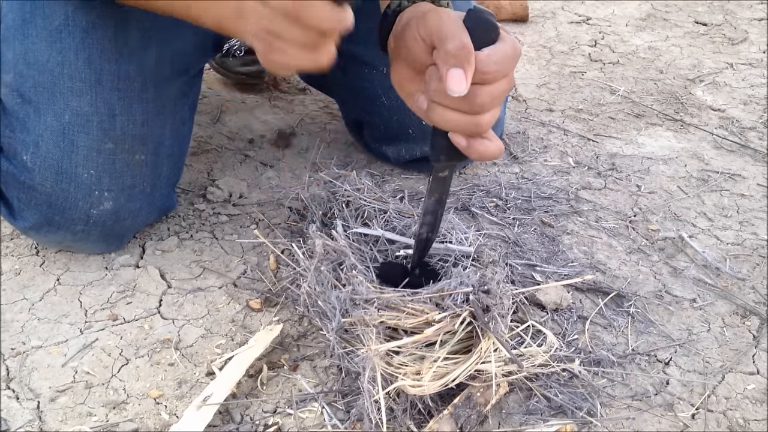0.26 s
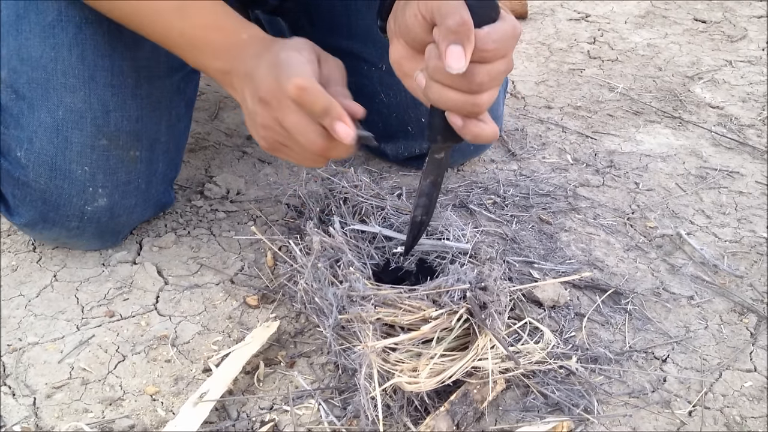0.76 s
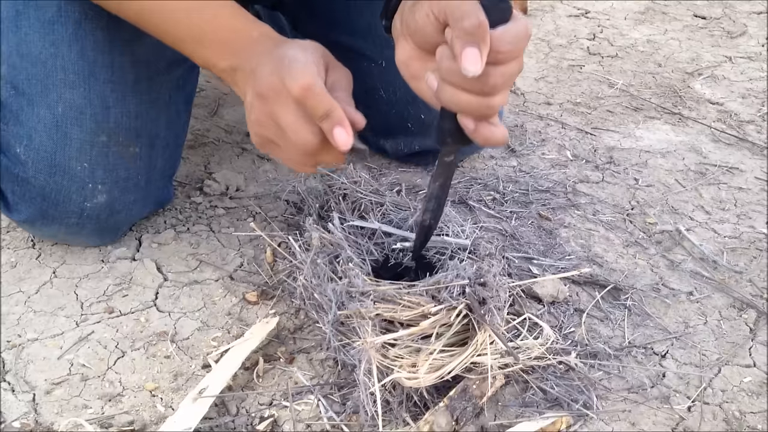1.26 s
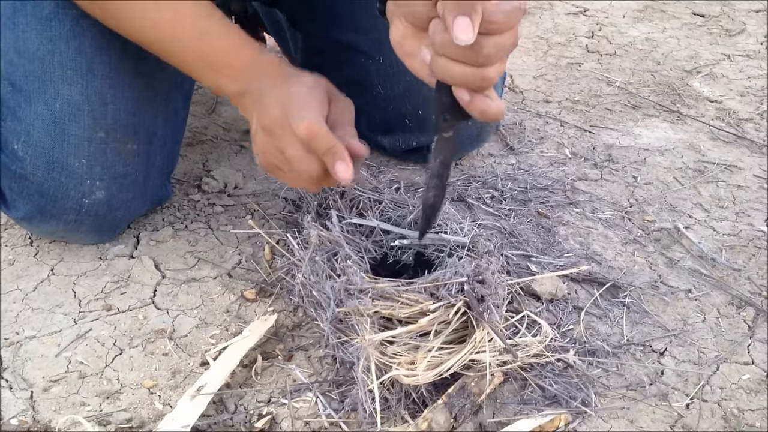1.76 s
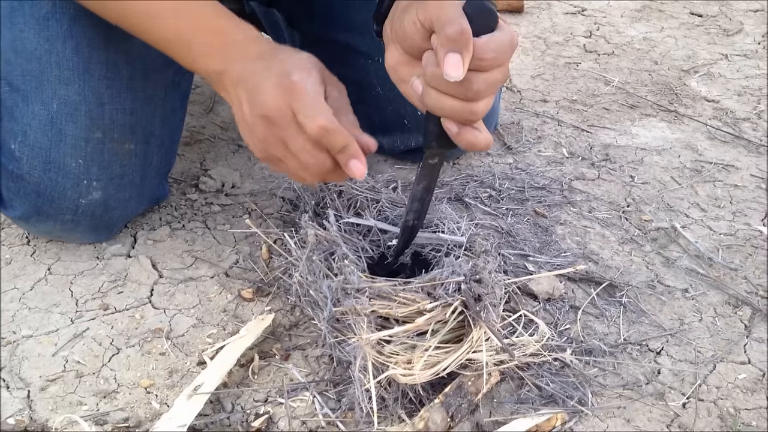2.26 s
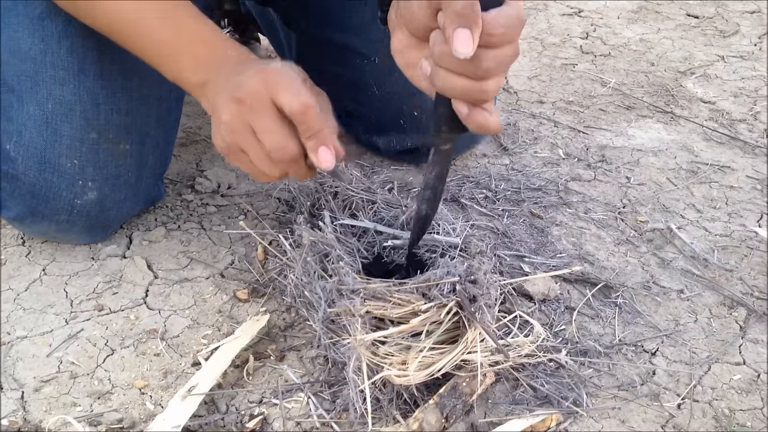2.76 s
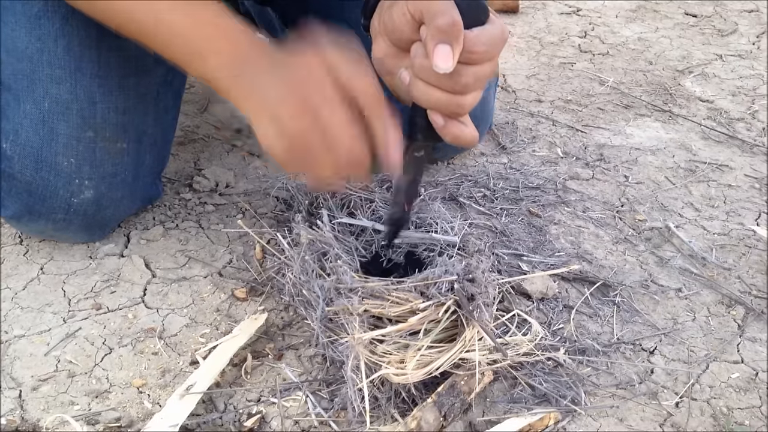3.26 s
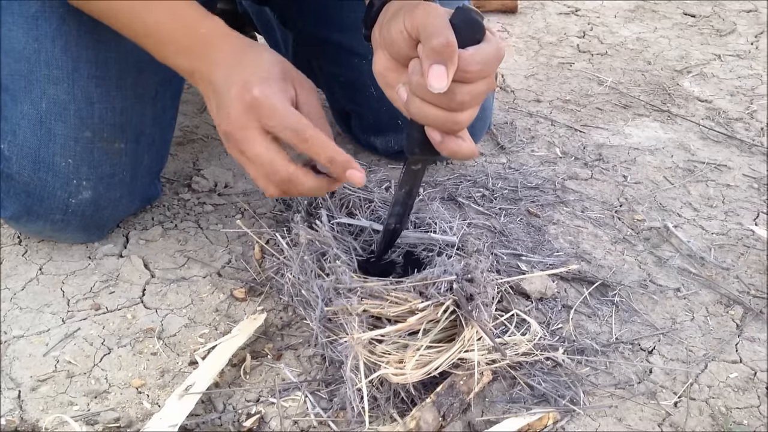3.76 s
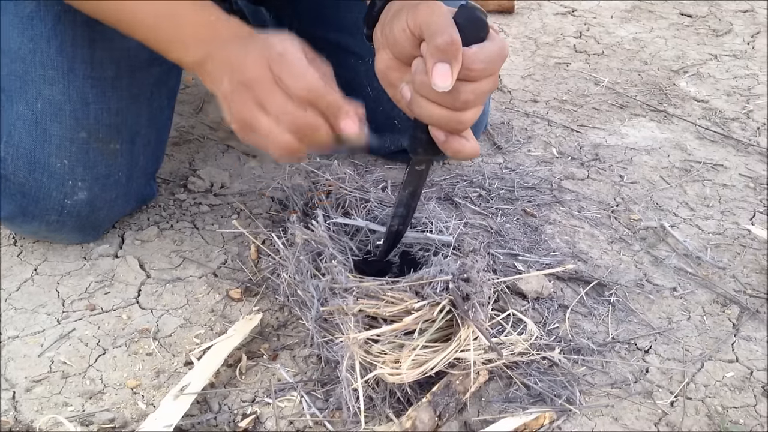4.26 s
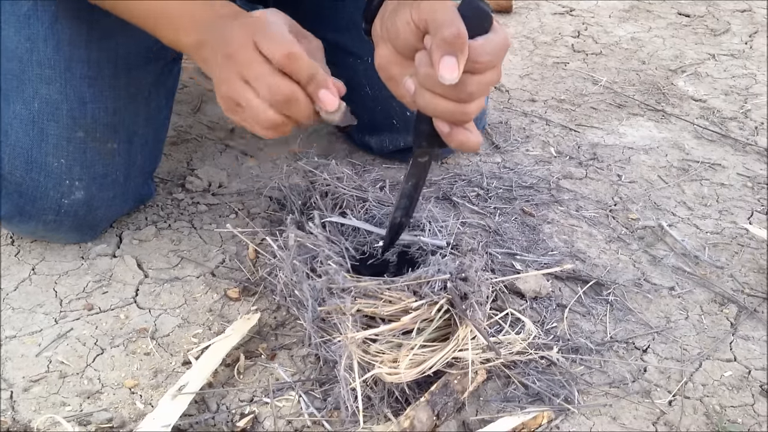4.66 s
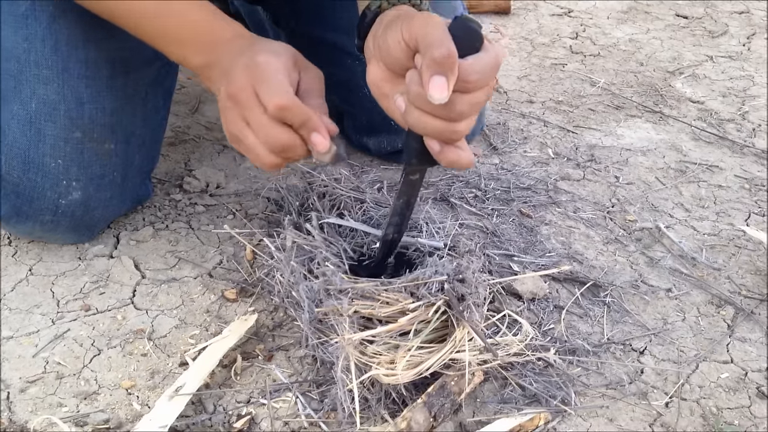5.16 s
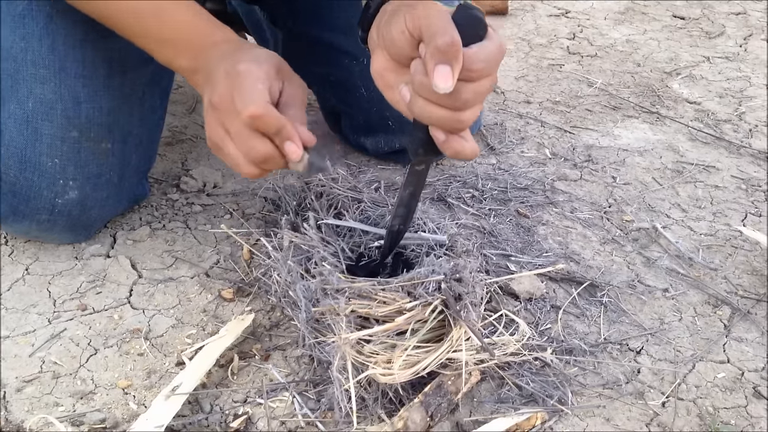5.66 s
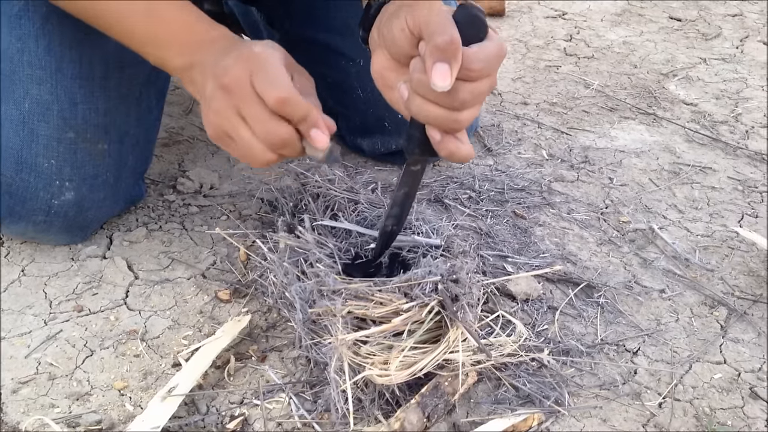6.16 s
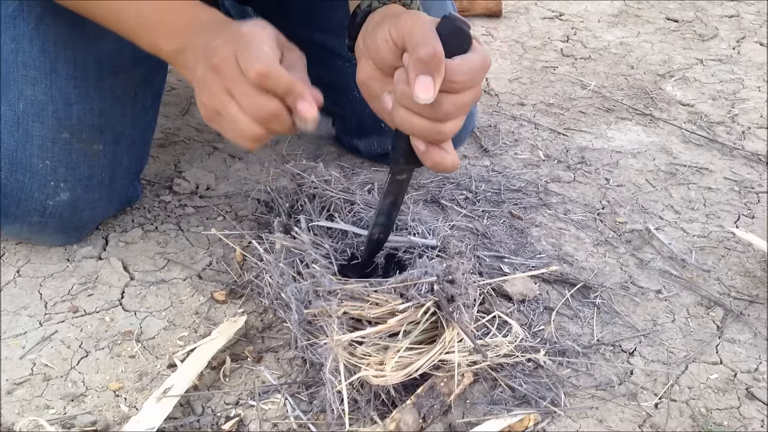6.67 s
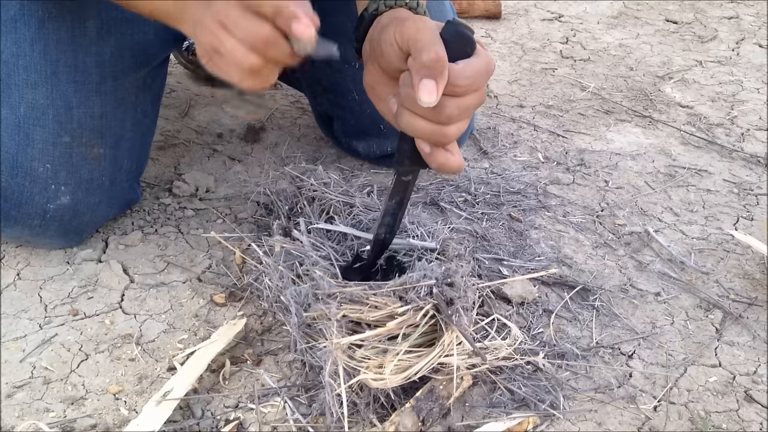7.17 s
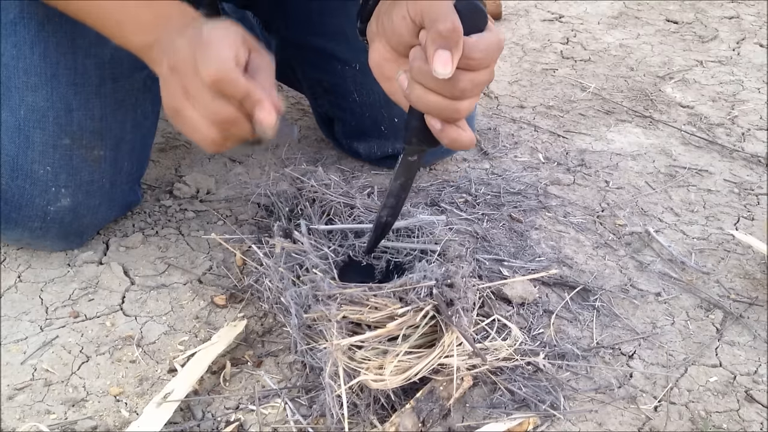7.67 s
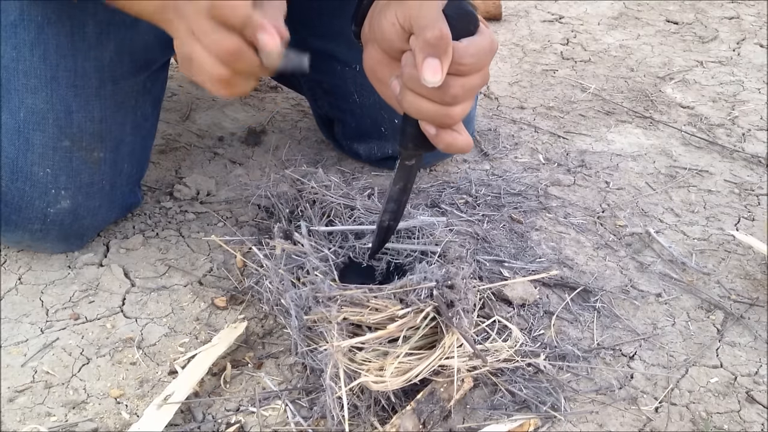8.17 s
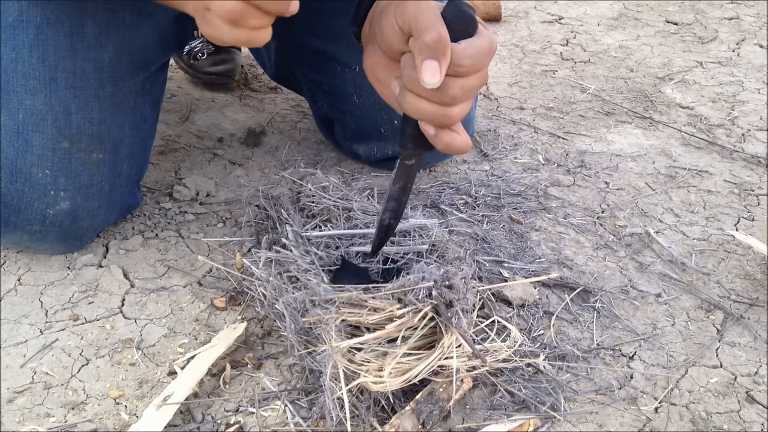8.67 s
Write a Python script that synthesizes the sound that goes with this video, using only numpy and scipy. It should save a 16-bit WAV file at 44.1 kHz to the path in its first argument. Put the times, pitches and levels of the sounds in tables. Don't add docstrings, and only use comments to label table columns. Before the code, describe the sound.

Close to a small camera microphone outdoors, flint strikes a hand-damped steel knife: dry, bright, gritty clicks with a millisecond-sharp attack, a skid of a few to twenty milliseconds and little ring. Strokes fall at about 0.1, 0.5, 1.3, 1.9, 2.9, 3.5, 4.6, 5.1, 5.7, 6.2, 6.7, 7.1, 8.1 and 8.5 seconds. Several rebound at once with duller knocks, notably at 0.5, 2.9 and 6.2. Tiny chips patter into straw afterwards, and cloth and fingers rustle very faintly. Tinder snaps near 6.2, 7.1 and 8.5, with a bump and crackling cluster at 7.5. A very faint, rising bird whistle comes at 1.4 to 1.7. Beneath, a distant engine slows from a rev to a low idle in the first half second, wavers, and cuts out near 6.4; other far engines and swelling road rumble continue, with a slightly stronger lorry drone from 6.7. Barely any echo.

```python
import sys
import numpy as np
from scipy import signal
from scipy.fft import rfft, irfft, next_fast_len
from scipy.io import wavfile
from scipy.ndimage import uniform_filter1d, map_coordinates

SR = 44100
rng = np.random.default_rng(int(sys.argv[2]) if len(sys.argv) > 2 else 0)


def makeup_ratio(level_db):
    decades = np.asarray(level_db, float) / 20
    return 10 ** decades


def digitize_waveform(pressure):
    field = np.atleast_2d(pressure).T
    bounded = np.clip(field, -1, 1)
    quanta = np.round(bounded * 32767).astype(np.int16)
    wavfile.write(sys.argv[1], SR, quanta)


N = 393813
T = np.arange(N) / SR
REBOUND_HZ = 4950


def flint():
    return blows() + jolts() + skids()


# start_s, level_db (over 1 ms), favoured pitch_hz, crack_db, knock_db
STROKES = [(0.071, -12.5, 5300, -16, -27), (0.5197, -8, 4710, -16, -24), (1.311, -9, 5250, -12, -24.5),
           (1.8903, -11, 5287, -9, -22.5), (2.8628, -10, 4125, -14.5, -22), (3.4739, -12, 3670, -15, -24),
           (4.6282, -10.5, 4690, -15, -22.5), (5.1424, -12.5, 3880, -8, -21),
           (5.68, -15, 4100, -13.5, -28.5), (6.1848, -10, 5010, -11, -25.5),
           (6.6719, -11.5, 4800, -21, -23), (7.0676, -12.5, 4720, -18.5, -30),
           (8.056, -13.5, 4000, -12.5, -22), (8.4995, -9.5, 3500, -19, -26)]
# start_s, level_db (over 1 ms), knock_db
REBOUNDS = [(0.5239, -26, -22), (0.5288, -15.5, -10.5), (1.3196, -25, -16), (2.8689, -21.5, -9.5),
            (2.8739, -30.5, -16), (2.8776, -22.5, -18), (3.48, -16.5, -12.5), (4.641, -30, -11),
            (4.6518, -21, -19.5), (5.1466, -16, -15), (6.1906, -22, -7.5), (6.1986, -26, -25),
            (6.6762, -21.5, -13.5), (7.0713, -32, -19.5), (8.0672, -18, -20)]


def blows():
    out, t = np.zeros(N), np.arange(SR // 20) / SR
    contacts = list(STROKES)
    for start_s, level_db, knock_db in REBOUNDS:
        _, blow_db, _, crack_db, _ = stroke_at(start_s)
        crack_db += 0.55 * (blow_db - level_db)
        contacts.append((start_s, level_db, REBOUND_HZ, crack_db, knock_db))
    for start_s, level_db, pitch_hz, crack_db, knock_db in contacts:
        hit = strike(burst(t, t60_s=0.0004), crack_db - 2.2, knock_db - 1.8, pitch_hz)
        add(out, start_s, makeup_ratio(level_db - 0.5) * hit)
    return out


# mode_hz, width_hz, level_db
JOLT = [(380, 520, -7), (1050, 420, 0)]


def jolts():
    out, t = np.zeros(N), np.arange(SR // 20) / SR
    for start_s, level_db, _, _, knock_db in STROKES:
        jolt_db = level_db - 17.5 + 0.5 * knock_db
        add(out, start_s, makeup_ratio(jolt_db) * ring(burst(t, t60_s=0.0002), JOLT, scatter_db=1.0))
    return out


# start_s, length_s, first_db, last_db
SKIDS = [(0.073, 0.0072, -25.5, -27.5), (0.5208, 0.0027, -12.5, -20.5), (0.525, 0.0031, -22.5, -31),
         (0.529, 0.0025, -22, -23), (1.312, 0.0095, -25, -29), (1.8922, 0.0105, -21, -31),
         (2.866, 0.015, -26, -28.5), (2.882, 0.02, -39.5, -50), (3.474, 0.016, -21, -26),
         (4.63, 0.011, -21.5, -34.5), (4.651, 0.0051, -26, -42.5), (5.1459, 0.012, -19, -26.5),
         (5.6794, 0.0046, -18, -25), (6.184, 0.018, -31, -29), (6.673, 0.005, -14.5, -27.5),
         (7.0696, 0.0049, -19, -33.5), (8.0556, 0.013, -19.5, -32), (8.5, 0.007, -32.5, -22),
         (8.5166, 0.0085, -40, -46)]


def skids():
    out, t = np.zeros(N), np.arange(SR // 20) / SR
    for start_s, length_s, first_db, last_db in SKIDS:
        _, blow_db, _, crack_db, knock_db = stroke_at(start_s)
        size = makeup_ratio(4.5 * rng.exponential(size=len(t)))
        chips = np.tanh(rng.standard_normal(len(t)) * size / 12)
        chips /= np.std(chips[t < length_s])
        slide_db = first_db + (last_db - first_db) * 1.6 * (np.minimum(t / length_s, 1) - 0.2961)
        lift_off_db = -60 * np.maximum(t - length_s, 0) / 0.01
        crack_db += -1.5 + 0.33 * (blow_db - first_db)
        force = chips * makeup_ratio(slide_db + lift_off_db)
        add(out, start_s, makeup_ratio(-2.5) * strike(force, crack_db, knock_db + 5, REBOUND_HZ))
    return out


def stroke_at(s):
    return min(STROKES, key=lambda row: abs(row[0] - s))


# mode_hz, width_hz, level_db
BLADE = [(2499, 300, -2), (3260, 370, -5), (3965, 330, -6.5), (4795, 380, -0.5), (5370, 480, -3),
         (5740, 340, -1.5), (6460, 450, -3), (7320, 1500, -10.5)]
# mode_hz, width_hz, level_db
EDGE = [(8600, 2200, -3), (10920, 830, -4.5), (11640, 600, -1), (13370, 750, -7), (14500, 460, -1)]
# mode_hz, width_hz, level_db
GRIP = [(550, 610, -27), (1080, 280, -13.5), (1450, 370, -8.5), (1840, 250, -1.5)]


def strike(force, crack_db, knock_db, pitch_hz=None):
    def middle_band(hz):
        highpass = (1j * hz / (1j * hz + 2400)) ** 3
        return highpass / (1 + 1j * hz / (0.76 * 7000) - (hz / 7000) ** 2) ** 2

    thin = filtered(force, middle_band)
    thin = thin * np.linalg.norm(force) / np.linalg.norm(thin)
    blade = ring(thin, BLADE, scatter_db=1.6, pitch_hz=pitch_hz)
    crack = makeup_ratio(crack_db) * ring(force, EDGE, scatter_db=3.5)
    knock = makeup_ratio(knock_db) * ring(force, GRIP, scatter_db=1.0)
    return blade + crack + knock


def ring(force, modes, scatter_db, pitch_hz=None, octaves=1.1):
    mode_hz, width_hz, level_db = np.transpose(modes)[:, :, None]
    level_db = level_db + scatter_db * rng.standard_normal(level_db.shape)
    if pitch_hz:
        level_db = level_db - 6 * (np.log2(mode_hz / pitch_hz) / octaves) ** 2
    gain = (-1.) ** np.arange(len(modes))[:, None] * makeup_ratio(level_db)

    def response(hz):
        damping = 1j * hz * width_hz
        return np.sum(gain * damping / (mode_hz * mode_hz - hz * hz + damping), axis=0)

    out = filtered(force, response)
    return out * np.linalg.norm(force) / np.linalg.norm(out)


def burst(t, t60_s):
    x = rng.standard_normal(len(t)) * makeup_ratio(-60 * t / t60_s)
    return x / np.linalg.norm(x) * np.sqrt(SR / 1000)


# start_s, level_db, pitch_hz
THUDS = [
    (4.63, -52.5, 200.7),
    (5.667, -47.5, 229.3),
    (5.68, -51, 301),
    (7.461, -45.5, 259),
    (7.477, -59, 326),
]
# start_s, level_db, t60_s, fizz_db, thump_db
SNAPS = [(1.983, -68, .01, -11, 5), (5.219, -60.5, 0.0089, 1.5, -22), (5.548, -64, 0.0091, 3, -20),
         (5.667, -43, 0.067, -7.5, 10), (6.2154, -39.5, 0.01, -1.5, -12.5), (7.0653, -38, 0.0078, -7, -15),
         (7.245, -63, .01, -5, -11), (7.296, -64.5, .01, -2, -7), (7.4605, -44, 0.017, -6, 8),
         (7.468, -51, 0.028, -7.5, 9), (7.4702, -34, 0.0083, 0.5, -6.5), (7.4765, -29, 0.024, -2, -8),
         (7.4865, -43, 0.021, -3.5, -13), (7.497, -52, 0.018, -2, -7), (8.522, -35.5, 0.039, -1.5, -10.5)]
# mode_hz, width_hz, level_db
STALK = [(3500, 2200, -2), (5500, 2300, 0)]
FIZZ = [(8860, 3000, 0), (12900, 4000, -2)]
NEST = [(498.7, 170, 2.5), (1310, 1300, 0.5)]


def tinder():
    out, t = np.zeros(N), np.arange(SR // 20) / SR
    for start_s, level_db, pitch_hz in THUDS:
        add(out, start_s, makeup_ratio(level_db + 13.5 - 60 * t / 0.01) * np.sin(2 * np.pi * pitch_hz * t))
    for start_s, level_db, t60_s, fizz_db, thump_db in SNAPS:
        force = makeup_ratio(level_db) * burst(t, t60_s)
        stalk = ring(force, STALK, scatter_db=5.0)
        fizz = makeup_ratio(fizz_db) * ring(force, FIZZ, scatter_db=-6.0)
        thump = makeup_ratio(thump_db) * ring(force, NEST, scatter_db=1.0)
        add(out, start_s, stalk + fizz + thump)
    return out


# start_s, level_db
DEBRIS = [(0.083, -56.5), (0.538, -59.5), (1.325, -61), (1.903, -59.5), (2.9, -64), (3.495, -60.5),
          (4.66, -56.5), (5.16, -62), (5.69, -75), (6.22, -58.5), (6.685, -62.5), (7.081, -65), (7.49, -72),
          (8.072, -57.5), (8.53, -55)]
# start_s, length_s, level_db, fine_db
SWISHES = [(0.655, 0.18, -72.5, -10.5), (0.748, 0.075, -81, -8), (1.497, .04, -82, -6),
           (2.149, 0.35, -84, -11), (2.547, .15, -82, -12), (3.73, 0.083, -83, -3), (3.85, 0.045, -72.5, 3),
           (3.905, 0.053, -78, -15), (4.068, 0.056, -74.5, 1.5), (4.159, .03, -80, 2),
           (4.188, .045, -81, 2), (5.183, 0.064, -73, -3), (5.283, 0.15, -80.5, -10),
           (5.474, 0.14, -80, -4.5), (5.713, 0.15, -77.5, -9), (7.086, 0.071, -76.5, -16),
           (7.211, 0.12, -77, -4), (7.5, 0.12, -85, -5), (8.909, 0.028, -71, -7)]
# freq_hz, density_db (per Hz)
STRAW = [(900, -27), (1700, -5.5), (2600, -5.5), (3400, -0.5), (4500, -4), (6200, -4), (8000, -9),
         (10000, -31.5)]
GRIT = [(6000, -42), (8500, -4.5), (12000, -2.5), (15500, -2), (17000, -22.5)]


def rustle():
    straw, grit, t = np.zeros(N), np.zeros(N), np.arange(SR // 2) / SR
    shapes = []
    for start_s, level_db in DEBRIS:
        denser_db = level_db + 60
        settle_s = np.clip(0.28 - 0.011 * denser_db, 0.1, 0.36)
        shower = makeup_ratio(level_db + 0.3 - 60 * t / settle_s) * (1 - np.exp(-t / 0.0034))
        shapes.append((start_s, shower, -8.5 + 0.75 * denser_db))
    for start_s, length_s, level_db, fine_db in SWISHES:
        swish = makeup_ratio(level_db) * abs(np.sin(np.pi * np.minimum(t / length_s, 1))) ** 0.6
        shapes.append((start_s, swish, fine_db))
    for start_s, shape, fine_db in shapes:
        add(straw, start_s, shape)
        add(grit, start_s, makeup_ratio(fine_db) * shape)
    grain = makeup_ratio(1.0 * wobble(90) + 2.5 * wobble(460))
    coarse = unit(grain * noise(STRAW, patchy_db=0.48))
    fine = unit(grain * noise(GRIT, patchy_db=1.2))
    return straw * coarse + grit * fine


# freq_hz, t60_s
GROUND = [(800, .06), (2600, .1), (7000, 0.12), (14000, 0.062)]


def ground(x):
    out, step = np.zeros(N), SR // 10
    peaks = abs(x[:N // step * step]).reshape(-1, step).max(axis=1)
    for start in np.flatnonzero(peaks > 1e-4) * step:
        hz, t, z = signal.stft(rng.standard_normal(SR // 4), SR, nperseg=256)
        decay = makeup_ratio(-60 * t / along(GROUND, hz)[:, None])
        tail = signal.istft(z * decay, SR, nperseg=256)[1]
        scatter = signal.fftconvolve(x[start:start + step], tail / np.linalg.norm(tail))
        add(out, start / SR + 0.0034, scatter)
    return out


# time_s, pitch_hz, level_db
BIRD = [
    (1.37, 4010, -87),
    (1.41, 4120, -85),
    (1.445, 4168, -84),
    (1.475, 4160, -86.5),
    (1.59, 4290, -80),
    (1.62, 4262, -77),
    (1.668, 4350, -73.5),
    (1.708, 4400, -71),
    (1.725, 4320, -84),
]


def bird():
    return tone(BIRD, drift=0.002, flutter_db=0.6, rate_hz=22)


# time_s, firing_hz, level_db
NEAR_ENGINE = [
    (0.0, 83.2, -52.5),
    (0.14, 74.7, -51.5),
    (0.55, 63.84, -48.5),
    (2.1, 64.26, -57),
    (3.35, 65.05, -48),
    (4.9, 64.8, -53),
    (5.58, 65.05, -48.5),
    (6.11, 65.6, -52.5),
    (6.4, 61.46, -68),
]
# start_s, end_s, first_hz, last_hz, level_db
ENGINES = [(0.0, 2.7, 84, 85, -54.5), (2.5, 6.2, 89.5, 91, -60.5), (6.5, 8.7, 90, 90.3, -60.5),
           (0.0, 4.0, 113.6, 113, -61.5), (6, 8.4, 113.5, 112.5, -61), (3, 5.4, 123.5, 126, -63.5),
           (6.0, 8.5, 128, 127.7, -62.5), (4.5, 5.4, 76, 70.9, -62), (6.5, 8.93, 74.5, 74, -56.5),
           (6.8, 8.93, 70, 70.6, -58), (8, 8.8, 219.5, 216, -73.5)]


def engines():
    fade_s, fade_db = 0.25, -18
    out = tone(NEAR_ENGINE, drift=0.006, flutter_db=2.5, rate_hz=4)
    for start_s, end_s, first_hz, last_hz, level_db in ENGINES:
        rows = [(start_s - fade_s, first_hz, level_db + fade_db), (start_s, first_hz, level_db),
                (end_s, last_hz, level_db), (end_s + fade_s, last_hz, level_db + fade_db)]
        out += tone(rows, drift=0.006, flutter_db=3.5, rate_hz=4)
    return out


# time_s, level_db
ROAD = [(0.0, -49.5), (1.12, -48.5), (1.89, -51), (3.9, -52.5), (4.48, -47), (4.95, -51.5), (5.74, -47),
        (6.44, -57.5), (6.91, -50.5), (7.6, -56), (8.93, -52.5)]
# freq_hz, density_db (per Hz)
DEEP = [(12, -30), (25, -19), (35, -7), (48, 6), (56, 4.5), (75, -44.5)]
RUMBLE = [(40, -31), (58, -1), (75, 2), (120, -6), (160, -15.5), (220, -53)]
DRONE = [(110, -29.5), (160, 2.5), (250, -1.5), (400, -9), (600, -45.5)]
RUSH = [(240, -35), (400, -3), (755, -7.5), (952, -7.5), (2300, -19.5), (4000, -26.5), (5200, -59),
        (8800, -120)]


def road():
    load_db, = curves(ROAD)
    deep = makeup_ratio(-63 + 1.2 * wobble(1.5)) * noise(DEEP)
    rumble = makeup_ratio(load_db - 5 + 0.89 * wobble(3)) * noise(RUMBLE)
    lorry_db = -67 + 4 / (1 + np.exp((6.7 - T) / 0.3))
    drone = makeup_ratio(lorry_db + 0.38 * wobble(2.5)) * noise(DRONE, patchy_db=0.3)
    rush = makeup_ratio(-72 + 0.14 * (load_db - load_db.mean())) * noise(RUSH, patchy_db=1.2)
    return deep + rumble + drone + rush


def tone(rows, drift, flutter_db, rate_hz):
    pitch_hz = curves(rows)[0]
    level_db = curves(rows, outside=-120)[1]
    level = uniform_filter1d(makeup_ratio(level_db + flutter_db * wobble(rate_hz)), size=600)
    phase = 2 * np.pi * np.cumsum(pitch_hz * (1 + drift * wobble(rate_hz))) / SR
    return np.sqrt(2) * level * np.sin(phase)


def noise(spectrum, patchy_db=0):
    z = signal.stft(rng.standard_normal(N), nperseg=512)[2]
    field = uniform_filter1d(rng.standard_normal(z.shape), size=6, axis=0)
    field = uniform_filter1d(field, size=10, axis=1)
    white = signal.istft(z * makeup_ratio(patchy_db * unit(field)), nperseg=512)[1][:N]
    return unit(filtered(white, lambda hz: makeup_ratio(along(spectrum, hz))))


def unit(x):
    return x / np.sqrt(np.mean(x ** 2) + 1e-20)


def along(points, hz):
    f, v = np.transpose(points)
    return np.interp(np.log(hz + 1), np.log(f + 1), v)


def curves(rows, outside=None):
    s, *cols = np.transpose(rows)
    return [np.interp(T, s, c, outside, outside) for c in cols]


def wobble(rate_hz):
    return map_coordinates(rng.standard_normal(int(N * rate_hz / SR) + 4), [T * rate_hz])


def filtered(x, response):
    m = next_fast_len(len(x) + 8192)
    return irfft(rfft(x, m) * response(np.fft.rfftfreq(m, 1 / SR)), m)[:len(x)]


def add(track, s, sound):
    part = track[round(s * SR):][:len(sound)]
    part += sound[:len(part)]


def scene():
    hits = flint()
    near = hits + makeup_ratio(-34) * ground(hits) + tinder() + rustle()
    return (near + engines() + road() + bird())[None]


def low_pass(x):
    return signal.sosfilt(signal.butter(12, 16550, fs=SR, output="sos"), x)


# freq_hz, density_db (per Hz)
HISS = [(1500, -29), (3000, 0), (5000, 2.5), (8000, -4.5), (11000, -9), (15300, -9)]


def record(dry):
    x = dry[0] / (1 + abs(dry[0] / 0.49) ** 8) ** (1 / 8)
    x = x + makeup_ratio(-87.5) * noise(HISS)
    loudness = 0.12 + uniform_filter1d(abs(x), size=40) / 0.3
    peaks = x * loudness * (uniform_filter1d(abs(x), size=400) > 0.01)

    def early(hz, samples):
        return np.exp(2j * np.pi * hz * samples / SR)

    def ghosts(hz):
        return makeup_ratio(-41.0) * early(hz, 1024) + makeup_ratio(-54) * early(hz, 512) * (1 + (hz / 9000) ** 3)

    def band_edges(hz):
        edge = makeup_ratio(-9.5) / (1 + ((hz - 3070) / 32) ** 2)
        top = makeup_ratio(-10.5 * (1 + np.tanh((hz - 15350) / 120)))
        return (1 + edge) * top

    x = filtered(x + filtered(peaks, ghosts), band_edges)
    return low_pass(x[None])


dry = scene()
out = record(dry)
digitize_waveform(out)
```